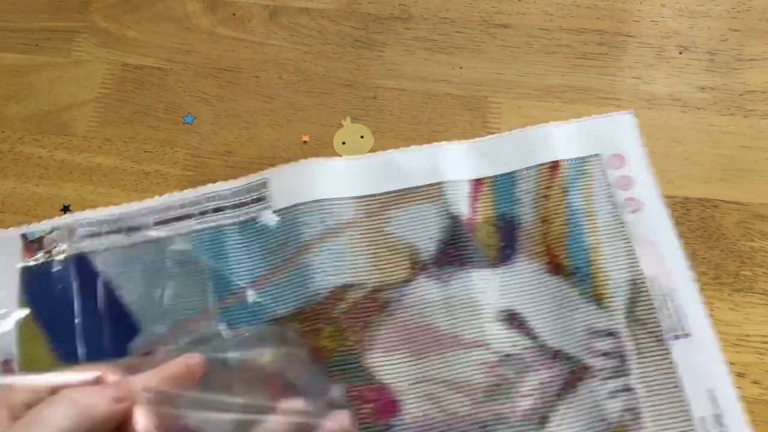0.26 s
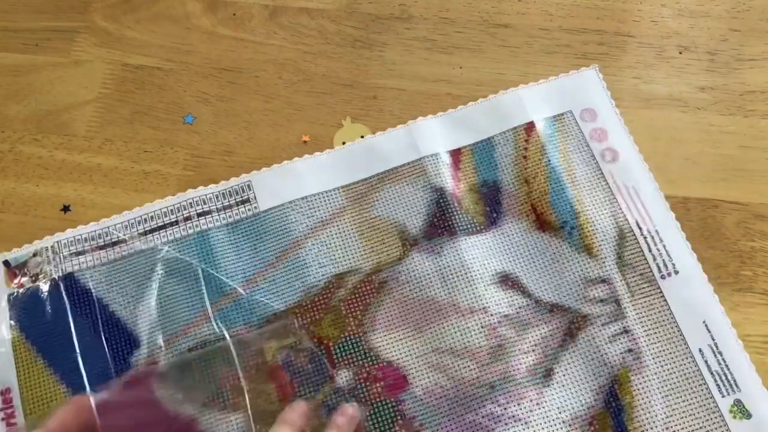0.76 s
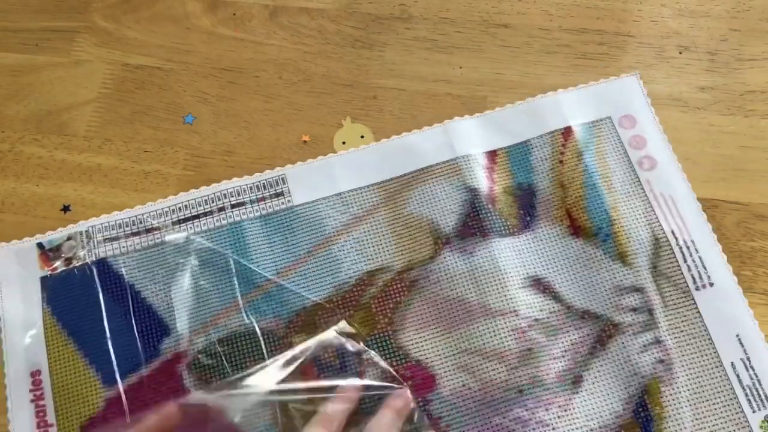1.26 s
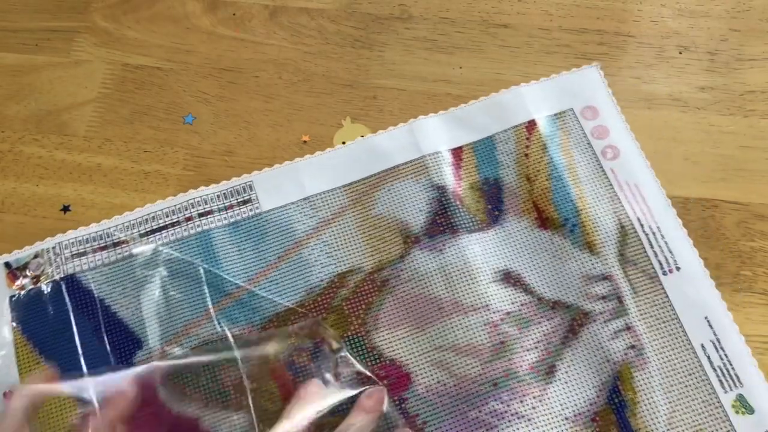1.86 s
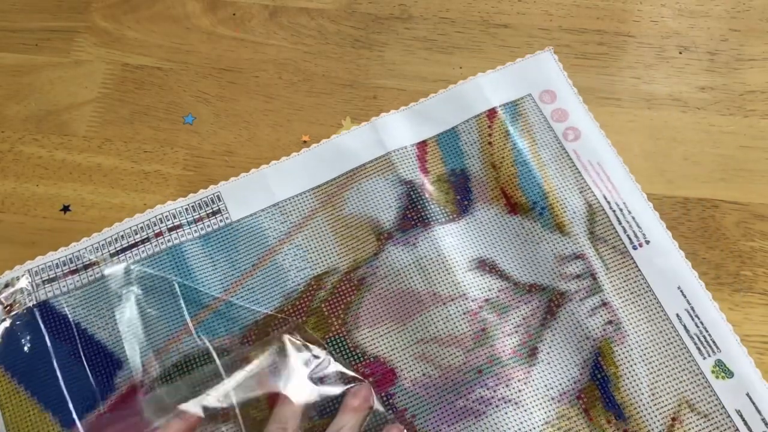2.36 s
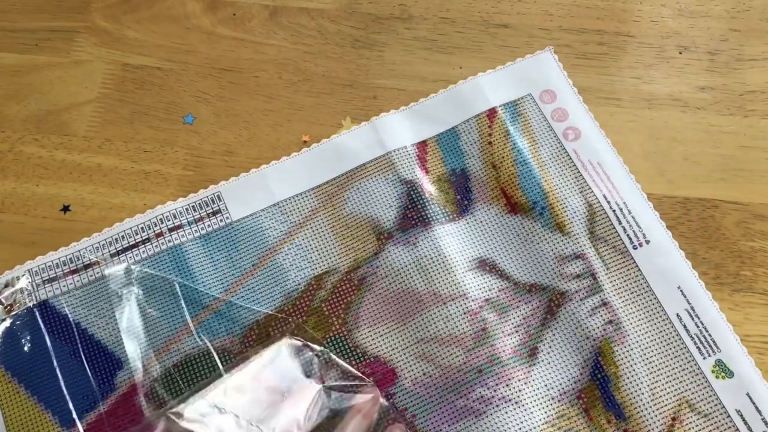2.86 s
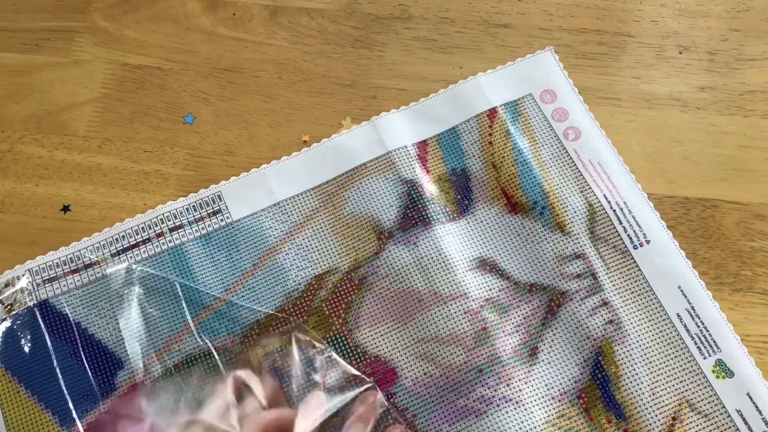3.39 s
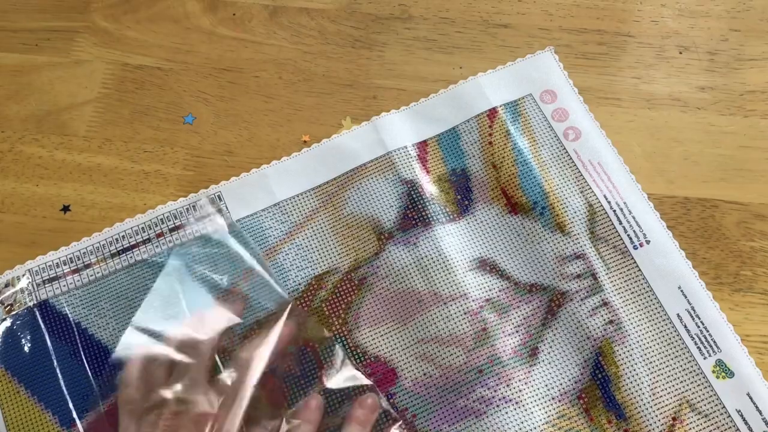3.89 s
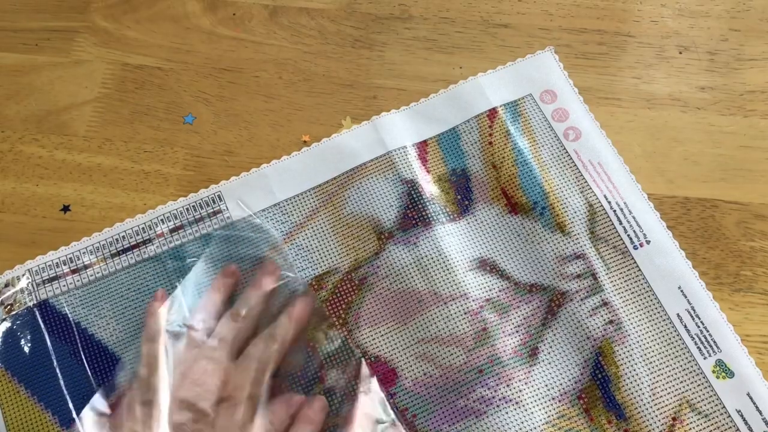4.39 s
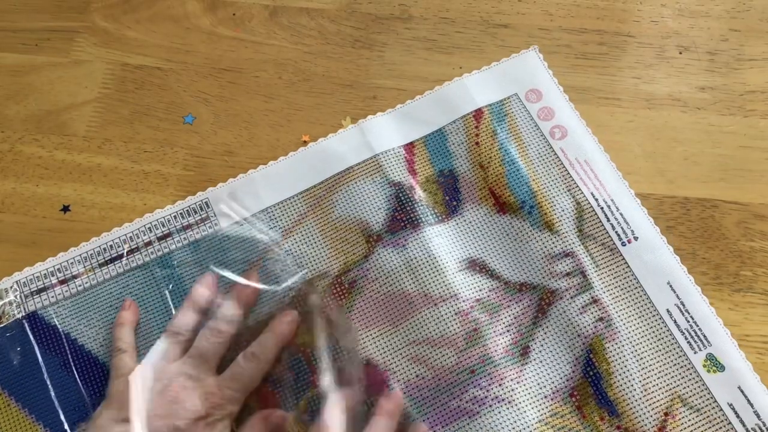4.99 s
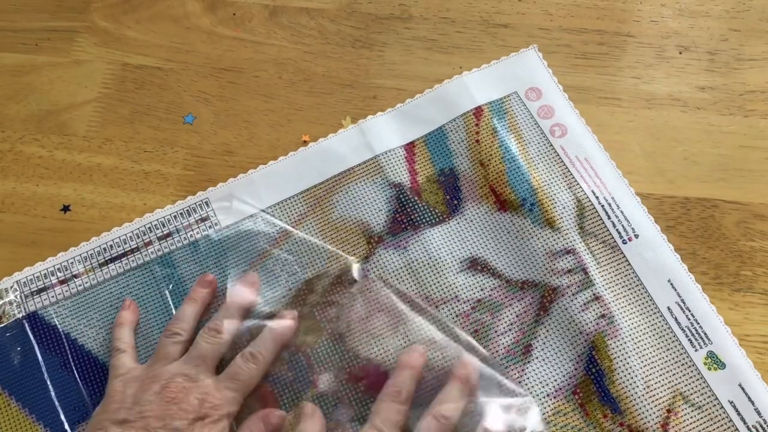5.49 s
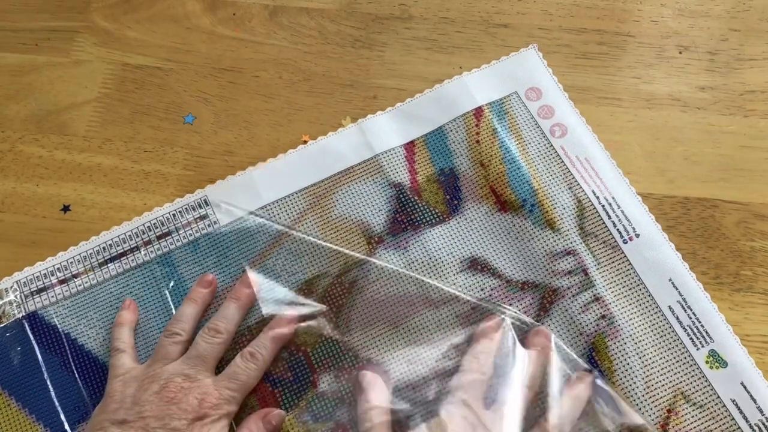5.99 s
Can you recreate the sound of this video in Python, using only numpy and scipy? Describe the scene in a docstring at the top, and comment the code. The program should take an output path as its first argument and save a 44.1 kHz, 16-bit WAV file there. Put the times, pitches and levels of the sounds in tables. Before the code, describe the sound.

Clear plastic film is handled and smoothed over a canvas, crinkling and snapping irregularly, busiest near the end, over a faint low hum.

```python
"""Small room, wooden table: hands peel a clear plastic cover film off a sticky canvas and smooth it back.
Creases snap as short clicks with a noise shiver, sheet flap and ring; hands thud on the table now and then.
Strokes swell, hold and settle; they drive crinkle (tiny noise folds over hiss), rub and air flutter.
Reflections and noise tails answer. A faint drone fades out; a mains hum sinks early and returns near halfway.
Low rumble lies beneath."""
import sys
import numpy as np
from scipy import signal
from scipy.fft import rfft, irfft, next_fast_len
from scipy.io import wavfile
from scipy.ndimage import uniform_filter1d, map_coordinates

SR = 44100
rng = np.random.default_rng(int(sys.argv[2]) if len(sys.argv) > 2 else 0)


def log_audio(samples):
    """Write samples as a 16-bit WAV file to the path given in sys.argv[1]."""
    # one column per channel
    frames = np.atleast_2d(samples).T
    # limit to full scale, then quantise
    limited = np.clip(frames, -1, 1)
    pcm = np.round(limited * 32767).astype(np.int16)
    wavfile.write(sys.argv[1], SR, pcm)


N = 275625

# colour of the crinkling film: f/Hz, density/dB per Hz
CRINKLE_COLOUR = [(1200, -26), (2500, -8.5), (3400, -13.5), (4300, -2), (5200, -3), (7000, -0.5),
                  (10000, 2), (11500, -1), (13000, -4.5), (16000, -16)]
# colour of the flapping sheet: f/Hz, density/dB per Hz
FLAP_COLOUR = [(100, -25), (300, -15.5), (600, -0.5), (1000, -2.5), (1600, 3), (2400, -1.5), (3300, -8.5),
               (5000, -53.5)]


def amp(db):
    """dB to amplitude ratio."""
    return 10 ** (np.asarray(db) / 20)


def unit(x):
    """x at rms 1."""
    return x / np.sqrt(np.mean(x ** 2) + 1e-20)


def packet(x):
    """x at energy 1."""
    return x / (np.linalg.norm(x) + 1e-20)


def along(points, hz):
    """(Hz, value) points interpolated on a log frequency axis."""
    f, v = np.transpose(points)
    return np.interp(np.log(hz + 1), np.log(f), v)


def curves(rows):
    """One value per sample for each column after the time."""
    s, *cols = np.transpose(rows)
    return [np.interp(np.arange(N) / SR, s, c) for c in cols]


def wobble(knots_per_s):
    """Smooth random curve through normal knots."""
    knots = rng.standard_normal(int(N * knots_per_s / SR) + 4)
    return map_coordinates(knots, [np.arange(N) * knots_per_s / SR])


def impulse(colour, size=4096):
    """Minimum-phase impulse response of energy 1 with the given colour."""
    cepstrum = irfft(np.log(amp(along(colour, np.fft.rfftfreq(size, 1 / SR)))))
    # fold the cepstrum onto positive time: causal
    cepstrum[1:size // 2] *= 2
    cepstrum[size // 2 + 1:] = 0
    return packet(irfft(np.exp(rfft(cepstrum))))


def through(x, response):
    """x convolved with a response, at its own length."""
    return signal.fftconvolve(x, response)[:len(x)]


def add(track, s, sound):
    """Mix a sound into the track at s seconds."""
    part = track[max(round(s * SR), 0):][:len(sound)]
    part += sound[:len(part)]


def brighten(x, lift_db, hinge_hz=10500):
    """Raise the treble above the hinge against the rest, with a partial level offset."""
    dull = signal.sosfiltfilt(signal.butter(2, hinge_hz, fs=SR, output="sos"), x)
    return amp(-lift_db / 4) * (dull + amp(lift_db) * (x - dull))


def background(hum_hz=59.3, drone_hz=77.4, air_db=-45.5):
    """Mains hum (sine) and faint phase-wandering drone over coloured-noise room rumble."""
    # tone rms levels: t/s, mains/dB, drone/dB
    tone_levels = [(0, -52, -49), (.4, -56, -57.5), (.8, -67, -60.5), (2.6, -65, -65), (2.88, -51.5, -73),
                   (2.99, -48.5, -81), (4.5, -48, -87), (6.25, -51, -82)]
    # room rumble: f/Hz, density/dB per Hz
    air_colour = [(20, 7), (30, 0.5), (38, 3.5), (48, -8.5), (60, -15), (85, -14), (120, -21), (280, -22.5),
                  (600, -23.5), (2000, -45), (5000, -45), (16000, -50)]
    turn = 2 * np.pi * np.arange(N) / SR
    hum_db, drone_db = curves(tone_levels)
    hum = amp(hum_db) * np.sin(hum_hz * turn)
    drone = amp(drone_db) * np.sin(drone_hz * turn + .5 * wobble(5.7))
    rumble = unit(through(rng.standard_normal(N), impulse(air_colour, size=16384)))
    return np.sqrt(2) * (hum + drone) + amp(air_db) * rumble


def room(x, count=16):
    """Diffuse wall answer: noise tails crossfaded in turn as the film moves about."""
    # decay of the room: f/Hz, t60/s
    decay = [(200, 0.084), (1500, 0.5), (8000, 0.13), (16000, 0.061)]
    wet, place = np.zeros(N), np.linspace(0, count - 1, N)
    for k in range(count):
        hz, t, z = signal.stft(rng.standard_normal(SR // 3), SR, nperseg=256)
        fall = amp(-60 * t / along(decay, hz)[:, None])
        onset = 1 - np.exp(-t / 0.0017)
        tail = signal.istft(z * fall * onset, SR, nperseg=256)[1]
        share = np.sqrt(np.maximum(1 - np.abs(place - k), 0))
        wet += through(x * share, packet(tail))
    return wet


def early(x, drift=0.0693):
    """First reflections off the table and nearby things; paths wander as the film moves."""
    # reflections: mean delay/s, level/dB
    paths = [(.0033, -33.5), (.0088, -18.5)]
    out = 0
    for delay_s, db in paths:
        lag = SR * delay_s * (1 + drift * wobble(2))
        out = out + amp(db) * map_coordinates(x, [np.arange(N) - lag])
    return out


def waft(rub, waft_db=-54, follow=0.28, flutter_db=-0.5):
    """Air pushed by the moving sheet: low noise flutter that swells with the rub."""
    # flutter: f/Hz, density/dB per Hz
    waft_colour = [(20, 12.5), (45, 0), (90, -10), (130, -7.5), (220, -9), (400, -8), (900, -62)]
    effort_db = uniform_filter1d(20 * np.log10(rub / rub.mean()), SR // 12)
    flutter = amp(flutter_db * wobble(14))
    lumps = unit(flutter * through(rng.standard_normal(N), impulse(waft_colour, size=16384)))
    return amp(waft_db + follow * effort_db) * lumps


def bumps():
    """Hands landing on the table: damped sine plus low-passed noise scuff."""
    # landings: t/s, level before the mix gains/dB, f/Hz, t60/s
    landings = [(0.18, -31, 194, 0.038), (0.276, -27, 120, 0.035), (2.157, -40, 80, 0.15),
                (4.072, -37.5, 230, 0.048), (4.088, -29.5, 84, 0.18), (5.974, -32, 182, 0.065)]
    out, t = np.zeros(N), np.arange(SR // 3) / SR
    for s, db, hz, t60 in landings:
        lowpass = signal.butter(3, 1.62 * hz, fs=SR, output="sos")
        scuff = unit(signal.sosfilt(lowpass, rng.standard_normal(len(t))))
        envelope = amp(db - 60 * t / t60) * (1 - np.exp(-t / 0.0027))
        add(out, s, envelope * (.7 * np.sin(2 * np.pi * hz * t) + 0.47 * scuff))
    return out


def gesture(start_s, swell_s, hold_s, settle_db_per_s):
    """Gain of one movement: linear swell, hold, exponential decay."""
    t = np.arange(N) / SR - start_s
    return np.clip(t / swell_s, 0, 1) * amp(-settle_db_per_s * np.maximum(t - swell_s - hold_s, 0))


def handling(settle_db_per_s=262, rub_settle_db_per_s=192):
    """Crinkle and rub gains: strokes add in power to the stir of the held film."""
    # pulls and smoothing strokes: start/s, swell/s, hold/s, crinkle/dB, rub of the whole sheet/dB
    strokes = [(0, 0.0017, 0.0045, -35.5, -42), (.07, 0.045, 0.054, -55, -51.5),
               (.255, 0.019, 0.041, -34, -39.5), (.33, 0.017, .1, -39.5, -49), (.5, 0.011, 0.4, -46, -53.5),
               (.8, 0.0096, 0.063, -30, -41), (.987, 0.0045, 0.0054, -34.5, -49),
               (1.14, .08, 0.015, -36.5, -47), (1.26, 0.016, 0.098, -42.5, -50.5),
               (1.41, 0.067, 0.016, -34.5, -44.5), (1.52, 0.015, 0.015, -40, -49),
               (1.712, 0.011, 0.047, -40, -45), (1.79, 0.073, 0.073, -35, -46), (2, 0.033, 0.077, -48, -53),
               (2.12, 0.043, 0.038, -37.5, -48), (2.27, 0.093, 0.017, -39.5, -50),
               (2.385, 0.013, .02, -33, -41.5), (2.502, 0.005, .01, -31.5, -41.5),
               (2.54, 0.027, 0.049, -36, -45), (2.742, 0.0089, 0.0066, -37.5, -49.5),
               (2.79, 0.056, 0.014, -36, -44.5), (2.96, 0.012, 0.006, -46.5, -52.5),
               (3.37, 0.052, 0.042, -36.5, -47), (3.49, 0.04, .04, -39, -48),
               (3.565, 0.0043, 0.014, -33, -45.5), (3.65, 0.016, 0.013, -29.5, -44.5),
               (3.715, 0.038, 0.027, -21.5, -31.5), (3.86, 0.088, 0.0078, -38.5, -47.5),
               (4.19, 0.085, 0.047, -33.5, -44.5), (4.37, 0.041, 0.008, -30.5, -41),
               (4.59, 0.01, 0.28, -62, -57), (4.87, 0.098, 0.11, -36, -42.5), (5.09, 0.07, 0.16, -41, -47),
               (5.33, 0.019, 0.0081, -34.5, -38.5), (5.44, 0.013, 0.18, -43.5, -53),
               (5.665, 0.012, .15, -38.5, -49.5), (5.84, 0.033, 0.11, -32.5, -44)]
    # the held film stirs until the hands come to rest; same columns
    stir = (0.0043, .01, 6.0, -56.5, -59.5)
    crinkle_power, rub_power = 0, 0
    for s, swell, hold, crinkle_db, rub_db in [*strokes, stir]:
        crinkle_power = crinkle_power + (amp(crinkle_db) * gesture(s, swell, hold, settle_db_per_s)) ** 2
        rub_power = rub_power + (amp(rub_db) * gesture(s, swell, hold, rub_settle_db_per_s)) ** 2
    return np.sqrt(crinkle_power + 1e-12), np.sqrt(rub_power + 1e-12)


def click(t, hz, cycles):
    """One buckling fold: a sine burst that swells at once and dies."""
    u = t * hz / cycles
    return u * np.exp(-u) * np.sin(2 * np.pi * hz * t)


def crackle(folds_per_s, spread_db, count=100):
    """Tiny folds of random size and pitch, each a short rasp; returns clicks and pushes on the sheet."""
    folds = rng.random((int(folds_per_s * N / SR), 3))
    start = (folds[:, 0] * (N - count)).astype(int)
    # sizes exponential in dB, capped at 3 spreads
    size = amp(spread_db * np.minimum(-np.log(1 - folds[:, 1]), 3))
    t = np.arange(count) / SR
    hz = 5000 * 3.6 ** folds[:, 2:]
    rasp = rng.standard_normal((len(folds), count)) * amp(-60 * t / 0.016)
    shapes = signal.fftconvolve(rasp, click(t, hz, 0.25), axes=1)[:, :count]
    shapes *= (size / np.linalg.norm(shapes, axis=1))[:, None]
    places = start[:, None] + np.arange(count)
    clicks = np.bincount(places.ravel(), shapes.ravel(), N)
    pushes = np.bincount(start, size * rng.choice([-1, 1], len(size)), N)
    return unit(clicks), unit(pushes)


def strays(crinkle, stray_db=-48, flap_db=-14):
    """Sparse larger folds tick on their own, also while the film is nearly still."""
    clicks, pushes = crackle(folds_per_s=30, spread_db=3.5)
    ticks = unit(through(clicks, impulse(CRINKLE_COLOUR)))
    flaps = through(pushes, impulse(FLAP_COLOUR))
    return amp(stray_db) * np.sqrt(crinkle / crinkle.mean()) * (ticks + amp(flap_db) * flaps)


def rustle(crinkle, rub, crinkle_db=-4, hiss_db=-2, push_db=-2, rub_db=-0.5,
           clump_db=2.2, tilt_db=4.0, merge=0.24, sweep_db=-36):
    """Moving film crackles over sliding hiss and rub, in clumps as it sticks and slips."""
    # rub of the whole sheet: f/Hz, density/dB per Hz
    rub_colour = [(60, -22.5), (140, -5), (280, -4), (450, 2), (750, 3.5), (1050, 2), (1400, 3),
                  (2100, -4.5), (3000, -1.5), (5000, -12)]
    # film tautness, taut is brighter: t/s, mean treble lift/dB
    tautness = [(0, -9), (.3, 2), (.6, -6), (.87, 2), (1.25, -1), (1.5, 2), (1.9, -8), (2.4, -4),
                (2.85, -14.5), (3.45, 0), (4, -9), (4.3, -1), (4.7, -15), (5.1, 1), (5.5, -8), (5.75, 1),
                (5.97, 4), (6.25, -8)]
    clicks, pushes = crackle(folds_per_s=480, spread_db=2.0)
    clumps = amp(clump_db * unit(wobble(90) + wobble(220)))
    # slow film ticks fold by fold; in a fast sweep the folds merge into hiss
    ticks = amp(crinkle_db - merge * (20 * np.log10(crinkle) - sweep_db))
    hiss = amp(hiss_db)
    fine = (ticks * clicks + hiss * rng.standard_normal(N)) / np.hypot(ticks, hiss)
    fine = unit(through(fine, impulse(CRINKLE_COLOUR)))
    fine = brighten(fine, curves(tautness)[0] + tilt_db * wobble(43))
    broad = amp(push_db) * pushes + amp(rub_db) * rng.standard_normal(N)
    broad = through(broad, impulse(rub_colour))
    return clumps * (crinkle * fine + rub * broad)


def snaps(shiver_db=0, flap_db=0, ring_db=0, shiver_t60=0.032, jerk_db=-3, lift_db=12, count=3):
    """Each crease creaks and clicks; the bend shivers through the film, the sheet around it flaps and rings."""
    # loudest creases: t/s, base level/dB, base f/Hz, shiver re base/dB, flap and ring re base/dB
    creases = [(0.161, -37, 8250, 7.5, -0.5), (0.297, -27, 9900, -3, -21), (.537, -33, 8700, -1, -10),
               (.612, -21, 9900, -14, -20), (.641, -16.5, 8960, -15, -21), (.664, -29.5, 8300, -16, -11),
               (0.803, -17, 8300, -5, -15), (.848, -18.5, 9600, -15, -18), (.858, -20, 8000, -7, -28),
               (.883, -19, 9400, -2.5, -11), (.894, -27, 8500, -12, -23), (0.989, -16.5, 8800, -7, -26),
               (1.134, -33.5, 9300, -5, -10), (1.226, -24, 9650, 0.5, -15), (1.286, -26, 8400, 3.5, -11),
               (1.33, -31, 8200, -11, -16), (1.676, -34, 5860, 1.5, -5.5), (1.719, -29, 8600, 3.5, -23),
               (2.257, -23.5, 6950, -5, -14.5), (2.356, -21.5, 8200, -10, -29),
               (2.408, -24, 8200, 3.5, -10), (2.464, -26, 8800, 4, -25), (2.646, -33, 8500, 6, -13),
               (2.673, -37, 8800, 4.5, -4), (2.803, -28.5, 6850, -3, -21), (3.007, -38, 9150, 0, -7),
               (3.109, -28, 8500, 4.5, -7), (3.226, -34, 8400, 4, -4), (3.239, -36, 7900, 1, -10),
               (3.568, -22, 7700, -10, -13), (3.742, -18, 8950, 0, -24), (3.780, -15, 7900, -1, -23),
               (3.893, -28.5, 8400, 4.5, -8), (3.996, -32, 9300, 2, -11), (4.044, -36.5, 7600, -4, -6.5),
               (4.258, -29, 8850, 3, -19), (4.299, -31.5, 8800, 10.5, -4.5), (4.363, -30.5, 8500, 10, -5),
               (4.369, -25.5, 9400, 6, -7.5), (4.478, -33.5, 7600, 4.5, -3.5), (4.648, -32, 7950, 4.5, -2),
               (4.878, -17.5, 8600, -12.5, -11), (4.926, -24.5, 7200, -20, -17), (4.956, -15, 9100, -1, -7),
               (4.980, -19.5, 5770, -10, -10.5), (5.004, -16, 9300, -16, -23),
               (5.010, -14.5, 8950, -5, -17), (5.027, -21, 9550, -13, -20), (5.035, -16.5, 6400, -7, -21),
               (5.052, -17.5, 9400, -5, -9), (5.065, -18.5, 9200, -4, -16), (5.099, -15.5, 9300, -9, -10),
               (5.118, -23.5, 8400, 7, -3.5), (5.138, -13, 7040, -11, -25), (5.146, -19, 10100, -1, -10),
               (5.155, -17, 6400, -2, -8), (5.204, -23, 9800, -23, -13), (5.210, -14.5, 9500, -12, -22),
               (5.228, -19, 9600, -4.5, -8), (5.277, -26.5, 9700, 6, -3), (5.357, -24.5, 7800, 10, 3),
               (5.367, -23.5, 8600, -8, -7), (5.396, -20, 8500, 5, 1.5), (5.423, -24, 9500, -7, -22),
               (5.454, -21.5, 9000, -0.5, -7.5), (5.472, -22.5, 8000, -6.5, -20),
               (5.481, -28.5, 8500, 5.5, -0.5), (5.506, -21, 10300, -3, -12.5),
               (5.550, -17.5, 9000, -1, -11), (5.602, -28, 8600, 6, 0.5), (5.682, -27.5, 8300, -3, -4.5),
               (5.689, -22.5, 8500, -0.5, -7), (5.700, -19, 9400, -4, -10.5),
               (5.731, -21.5, 10000, -1, -22), (5.753, -21.5, 9500, -22, -12.5),
               (5.856, -22, 9800, -19, -29), (5.863, -20, 9600, -5, -17), (5.917, -19.5, 10600, -6, -18),
               (6.004, -26, 8450, -8, -17), (6.151, -46.5, 5900, 1, -1)]
    # ring of the taut sheet, before random scatter: f/Hz, level/dB, t60/s
    sheet_modes = [(1615, 3.5, 0.051), (1890, 3.5, 0.017), (1380, -5.5, 0.034), (1140, -3.5, 0.033),
                   (680, -16, 0.039)]
    out, t = np.zeros(N), np.arange(SR // 12) / SR
    crinkle, flap = impulse(CRINKLE_COLOUR), impulse(FLAP_COLOUR)
    span = np.sqrt(.002 * SR)  # levels are rms over 2 ms
    cycles, tick_db, lead_db, flap_t60, mode_scatter_db = .85, .5, -20, .03, 4
    for s, db, hz, after_db, low_db in creases:
        grit = rng.standard_normal((3, len(t)))
        # the fold gives way in a few jerks within a millisecond or two
        lags = 0.000446 * (np.arange(count) + .5 + rng.random(count))
        jerks = 0
        for k, lag in enumerate(lags):
            jerk_hz = hz * rng.lognormal(0, 0.047)
            jerks = jerks + amp(-2 * k) * click(np.maximum(t - lag, 0), jerk_hz, cycles / 2)
        tick = packet(packet(click(t, hz * 1.053, cycles)) + amp(jerk_db) * packet(jerks))
        shiver = grit[0] * (1 - np.exp(-t / 0.0029)) * amp(-60 * t / shiver_t60)
        # a higher crease shivers brighter
        shiver = packet(brighten(through(shiver, crinkle), lift_db * np.log2(hz / 8500)))
        puff = grit[1] * (amp(-60 * t / flap_t60) + 3 * amp(-60 * t / .007))
        puff = packet(through(puff, flap))
        ring = 0
        for f, level, t60 in sheet_modes:
            mode = amp(level + rng.normal(0, mode_scatter_db) - 60 * t / t60)
            ring = ring + mode * np.sin(2 * np.pi * f * rng.normal(1, 0.031) * t)
        # the harder the sheet flaps, the more it rings
        body = packet(puff + amp(ring_db + .5 * low_db) * packet(ring))
        snap = amp(tick_db) * tick + amp(after_db + shiver_db) * shiver + amp(low_db + flap_db) * body
        add(out, s, span * amp(db) * snap)
        # the crease creaks for a few milliseconds before it gives
        lead_s = rng.uniform(0.0024, 0.0099)
        creak = packet(through(grit[2] * (t < lead_s), crinkle))
        add(out, s - lead_s, span * amp(db + lead_db) * creak)
    return out


def scene(wet_db=-15.5):
    """Film and hands close by, the room behind."""
    crinkle, rub = handling()
    near = snaps() + rustle(crinkle, rub) + strays(crinkle) + bumps()
    return (near + early(near) + amp(wet_db) * room(near) + waft(rub) + background())[None]


def record(dry, top_hz=15950):
    """The recorder clips at full scale, then keeps nothing above its band limit."""
    m = next_fast_len(N + SR // 2)
    spectrum = rfft(np.clip(dry, -1, 1), m)
    return irfft(spectrum * (np.fft.rfftfreq(m, 1 / SR) < top_hz), m)[..., :N]


dry = scene()
out = record(dry)
log_audio(out)
```